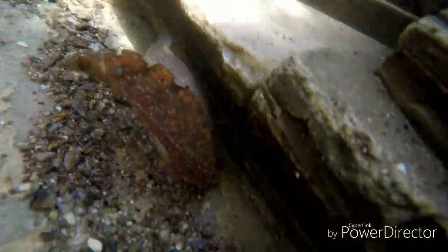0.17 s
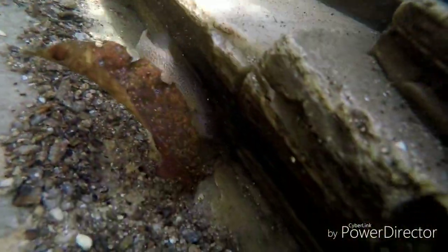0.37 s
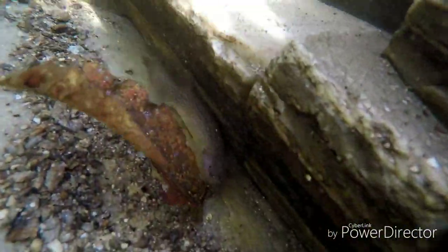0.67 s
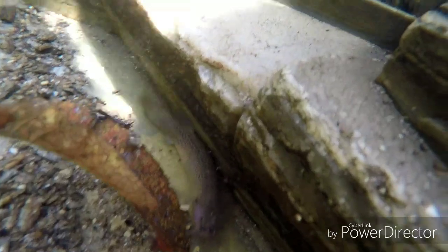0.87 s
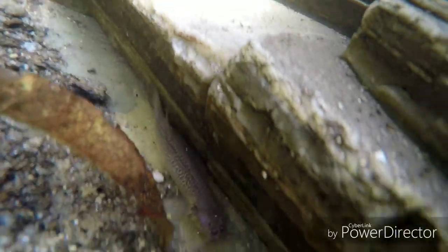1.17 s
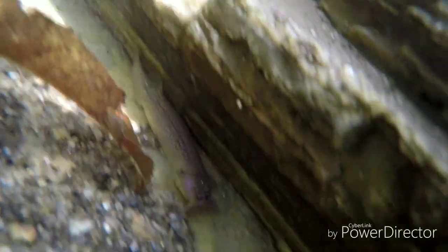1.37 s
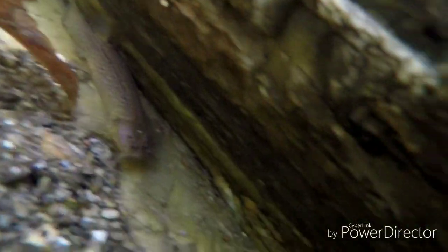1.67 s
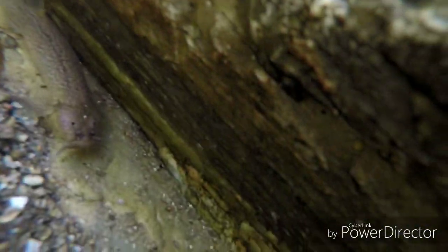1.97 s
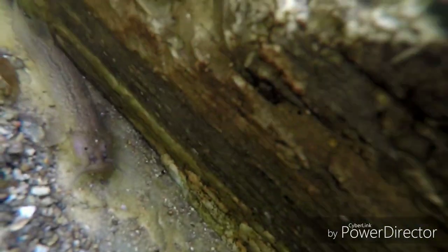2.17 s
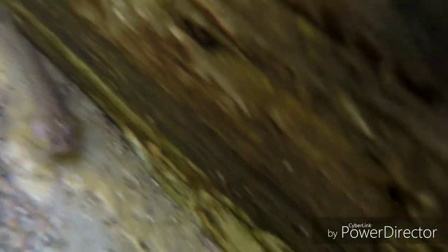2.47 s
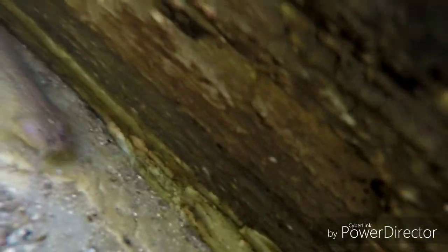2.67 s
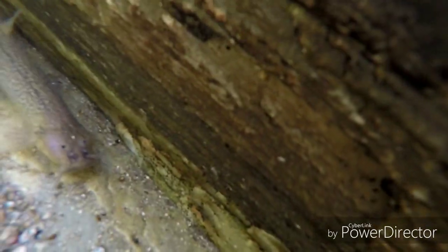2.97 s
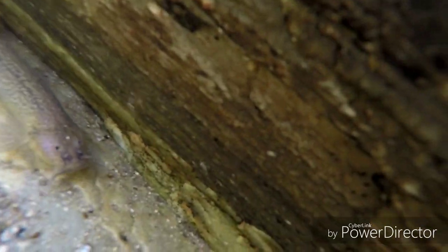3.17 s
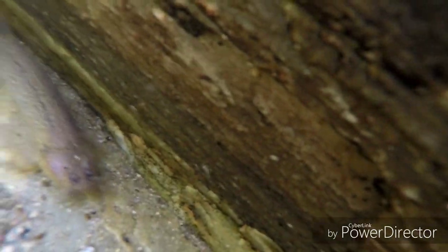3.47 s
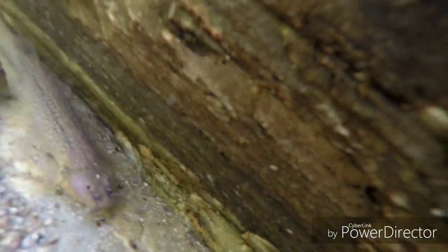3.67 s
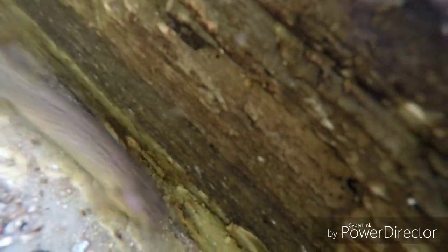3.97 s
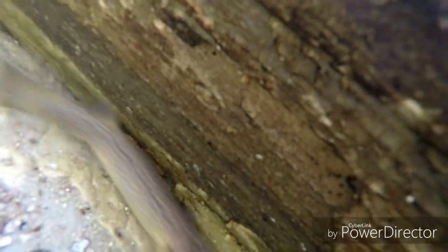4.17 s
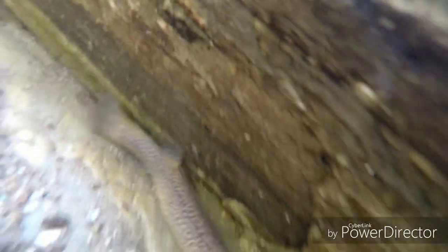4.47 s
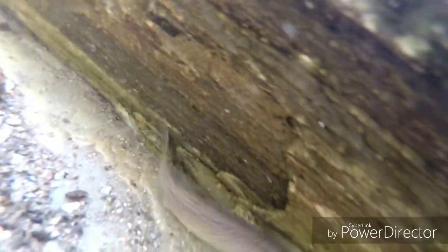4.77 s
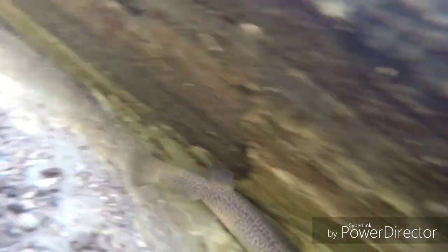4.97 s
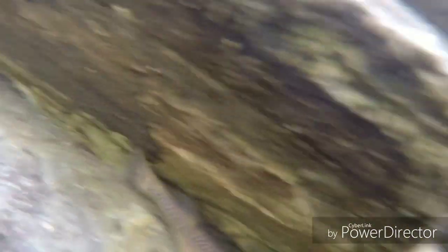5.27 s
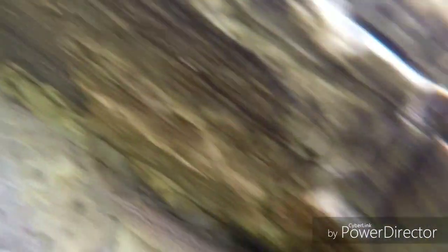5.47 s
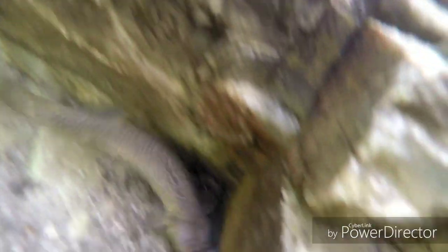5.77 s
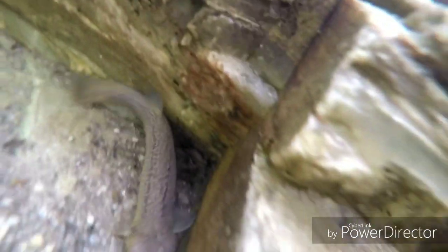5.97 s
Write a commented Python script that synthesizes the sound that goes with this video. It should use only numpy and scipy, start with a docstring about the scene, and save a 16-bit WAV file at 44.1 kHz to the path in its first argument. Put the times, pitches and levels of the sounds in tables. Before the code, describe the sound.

Submerged waterfall wash with ringing bubbles and faint sand ticks, broken by sharp knocks, boomy bumps and overloaded scraping around four seconds.

```python
"""Underwater in a pool below a waterfall, heard inside a waterproof camera housing. Throughout, shaped noise
and bubble tones form a muffled wash over a low noise rumble, and sand and pebbles click, strong hits with a
bright crackle. From 0.6 s near bubbles ring as damped sines, from 1.4 s bumps on rock give decaying low swings,
and from 1.7 s a gripping hand rustles. From 2.6 s, most densely from 3.7 to 4.2 s, noise jolts scrape the shell
over grit, the rumble swells near 4 s and the loudest bumps overload the input. Bubbles carry on to the end."""
import sys
import numpy as np
from scipy import signal
from scipy.fft import rfft, irfft, next_fast_len
from scipy.io import wavfile
from scipy.ndimage import uniform_filter1d, map_coordinates

SR = 44100
rng = np.random.default_rng(int(sys.argv[2]) if len(sys.argv) > 2 else 0)


def generate_wav(sig):
    """Save sig (samples, or channels by samples) to the path in sys.argv[1] as 16-bit PCM at SR."""
    pcm = np.round(np.clip(np.atleast_2d(sig).T, -1, 1) * 32767).astype(np.int16)
    wavfile.write(sys.argv[1], SR, pcm)


N = 269451


def amp(db):
    """Level definition: amplitude ratio of a level in dB."""
    return 10 ** (np.asarray(db) / 20)


def unit(x):
    """Energy normalisation: x at rms 1."""
    return x / np.sqrt(np.mean(x ** 2) + 1e-20)


def curves(rows):
    """Linear interpolation: one value per sample for each column after the time."""
    s, *columns = np.transpose(rows)
    return [np.interp(np.arange(N) / SR, s, column) for column in columns]


def wobble(rate):
    """Band-limited random modulation: a smooth curve through rate random knots a second."""
    knots = rng.standard_normal(int(N * rate / SR) + 4)
    return map_coordinates(knots, [np.arange(N) * rate / SR])


def filtered(x, response):
    """Linear filtering: the spectrum of x times a complex response of frequency."""
    m = next_fast_len(N + SR // 2)
    return irfft(rfft(x, m) * response(np.fft.rfftfreq(m, 1 / SR)), m)[:N]


def coloured(x, points):
    """Spectral shaping: x weighted by (f/Hz, level/dB) points on a log frequency axis, rms 1."""
    f, db = np.transpose(points)

    def response(hz):
        return amp(np.interp(np.log(hz + 1), np.log(f + 1), db, left=-120))
    return unit(filtered(x, response))


def resonate(x, modes):
    """Modal resonance: summed power peaks with steep skirts, made causal by minimum phase."""
    def response(f):
        power = 0
        for centre, width, db in modes:
            damping = (f * width) ** 2
            peak = damping / ((centre * centre - f * f) ** 2 + damping)
            power = power + amp(2 * db) * peak ** 1.665  # the exponent steepens the skirts
        # folding the cepstrum onto positive time gives minimum phase
        cepstrum = irfft(np.log(power + 1e-16) / 2)
        half = len(cepstrum) // 2
        cepstrum[1:half] *= 2
        cepstrum[half + 1:] = 0
        return np.exp(rfft(cepstrum))
    return filtered(x, response)


# resonances of the shell for sound in the water: f/Hz, width before steepening/Hz, level/dB
HOUSING_MODES = [(597, 352, 4), (863, 510, -34), (1386, 246, -5.5), (2146, 700, -7.5), (2514, 85, -7),
                 (2890, 1300, -19.5), (3840, 470, -13), (4450, 260, -17.5), (5820, 590, -22.5),
                 (7330, 1700, -28), (8540, 117, -18.5), (10600, 7100, -50)]


def housing(x):
    """Transmission through a resonant shell: sound in the water excites its modes."""
    return resonate(x, HOUSING_MODES)


# resonances of the shell when touched directly: f/Hz, width before steepening/Hz, level/dB
TOUCHED_MODES = [(509, 215, -7), (640, 210, -4), (704, 620, -9.5), (1079, 175, -6), (1570, 210, -8.5),
                 (2033, 230, -6), (2477, 340, -6), (2940, 600, -50), (3400, 570, -18.5), (4270, 510, -27.5),
                 (5150, 220, -31.5)]


def touch(blunt, sharp):
    """Contact excitation: blunt force rings the low modes, sharp force the high; wet grit lacks the very high."""
    low, high = np.split(TOUCHED_MODES, [4])

    def soft(x):
        return filtered(x, lambda hz: 1 / (1 + 1.1j * hz / 6000 - (hz / 6000) ** 2) ** 3)
    return np.array([resonate(soft(blunt), low), resonate(soft(sharp), high)])


EDGE_DB = 24  # a stroke swells from, and sinks to, this far under its full level


def strokes(rows, db, size):
    """Amplitude envelope: strokes swell, hold and sink, then three moving averages of size samples round them."""
    t, gain = np.arange(N) / SR, np.zeros(N)
    for (start, rise, hold, fall, *_), top_db in zip(rows, db):
        corners = start + np.cumsum([0, rise, hold, fall])
        shape_db = np.interp(t, corners, [-EDGE_DB, 0, 0, -EDGE_DB], left=-120, right=-120)
        gain = np.maximum(gain, amp(top_db + shape_db))  # overlapping strokes: the louder wins
    for _ in range(3):
        gain = uniform_filter1d(gain, size)
    return gain


def bubbles(s, db, hz, cycles, rise, count):
    """Bubble oscillation: damped sines with a soft start; pitch climbs as a bubble nears the surface."""
    t = np.arange(count) / SR
    age = t * (hz / cycles)[:, None]  # in lives of the given number of cycles
    envelope = amp(db)[:, None] * np.exp(-3 * age) * (1 - np.exp(-12 * age))
    turns = hz[:, None] * t * (1 + rise * np.minimum(age, 2))
    ring = envelope * np.sin(2 * np.pi * turns)
    at = np.round(s * SR).astype(int)[:, None] + np.arange(count)
    return np.bincount(at.ravel(), ring.ravel(), N + count)[:N]


def cloud(count, hz, octaves, cycles, size_db, length):
    """Random superposition: bubbles at random times, many faint and few strong, rms 1."""
    u, g = rng.random((count, 2)), rng.standard_normal(count)
    pitch_hz = np.clip(hz * 2 ** (octaves * g), 150, 12000)
    level_db = -size_db * np.log(u[:, 1])
    return unit(bubbles(u[:, 0] * N / SR, level_db, pitch_hz, np.full(count, cycles), .1, count=length))


# the waterfall's churning, before its fluctuations: t/s, wash level/dB, fizz level/dB
CHURN_LEVELS = [(0.0, -46, -50.5), (0.41, -47.5, -51), (0.63, -45.5, -50), (1.56, -46.5, -50.5),
                (1.94, -45.5, -50), (2.15, -44.5, -49), (2.75, -49, -52), (3.06, -47, -49.5),
                (3.45, -48.5, -52), (3.7, -46.5, -51), (4.34, -45.5, -49.5), (5.6, -46, -48.5),
                (6.11, -47, -51)]
# low rumble of water and of handling, swelling with the scrape near 4 s, before its fluctuations:
# t/s, slow rumble level/dB, quicker rumble level/dB
RUMBLE_LEVELS = [(0.0, -39.5, -55), (0.92, -44, -60), (1.53, -35.5, -55), (1.82, -41, -39.5),
                 (1.92, -43.5, -55), (2.45, -36, -57), (2.67, -47, -47), (2.91, -34.5, -68),
                 (3.03, -34, -54.5), (3.47, -42.5, -50), (3.78, -42, -57), (3.91, -31, -35),
                 (4.02, -20, -47), (4.2, -40, -48), (4.75, -39.5, -52), (5.31, -38, -51.5),
                 (5.51, -35, -46), (6.11, -34, -51)]
# relative spectra of wash, fizz, slow rumble and quicker rumble: f/Hz, level per Hz/dB
WASH_SPECTRUM = [(150, 27.5), (300, 2.5), (600, 1), (1200, -1.5), (1700, 0.5), (2200, -22)]
FIZZ_SPECTRUM = [(1300, -42), (1800, -4), (2200, 0.5), (5000, 0), (7000, -0.5), (10000, 6.5), (15000, 16.5)]
SLOW_SPECTRUM = [(12, 6), (25, 5.5), (45, -4.5), (70, -14.5), (110, -31), (200, -102)]
QUICK_SPECTRUM = [(50, 6), (90, 1.5), (170, -2), (240, -9.5), (400, -44), (700, -85)]
SLOW_WOBBLE_DB = 1.8  # unevenness of the slow rumble


def water():
    """Turbulence and bubble noise: far churning with nearer bubbles, over the low rumble of water and handling."""
    wash_db, fizz_db = curves(CHURN_LEVELS)
    slow_db, quick_db = curves(RUMBLE_LEVELS)
    big = cloud(count=2500, hz=585, octaves=0.625, cycles=6.3, size_db=1.0, length=1200)
    small = cloud(count=6000, hz=4675, octaves=0.672, cycles=12, size_db=2.1, length=400)
    clump_db = -9 + 2.5 * wobble(5)  # small bubbles arrive in clumps
    wash_source = rng.standard_normal(N) + amp(-17) * big
    fizz_source = rng.standard_normal(N) + amp(clump_db) * small
    wash = unit(housing(coloured(wash_source, WASH_SPECTRUM)))
    fizz = unit(housing(coloured(fizz_source, FIZZ_SPECTRUM)))
    surge = wobble(5.6)  # shared by wash and fizz
    wash_swell_db = .6 * surge + 1.2 * wobble(18)
    fizz_swell_db = 0.66 * surge + .7 * wobble(25)
    churn = amp(wash_db + wash_swell_db) * wash + amp(fizz_db + fizz_swell_db) * fizz
    slow = amp(slow_db + SLOW_WOBBLE_DB * wobble(9)) * coloured(rng.standard_normal(N), SLOW_SPECTRUM)
    quick = amp(quick_db + 1.26 * wobble(12)) * coloured(rng.standard_normal(N), QUICK_SPECTRUM)
    return churn + slow + quick


# a few sand grains at set times, one at 1.7 s much the loudest: t/s, nominal peak level/dB
SET_GRAINS = [(0.1476, -50), (1.6995, -21.5), (3.681, -46), (4.2916, -44)]


def sand():
    """Impact radiation: drifting grains tap the window as thin clicks, mostly faint."""
    u = rng.random((260, 3))
    random_db = -62 - 2.6 * np.log(u[:, 1])
    random_hz = 4000 * 4.3 ** u[:, 2]
    random_grains = bubbles(u[:, 0] * N / SR, random_db, random_hz, np.full(len(u), 2.5), 0, count=60)
    s, db = np.transpose(SET_GRAINS)
    return random_grains + bubbles(s, db, np.full(len(s), 5500), np.full(len(s), 1.1), 0, count=60)


# the clearest near bubbles: t/s, nominal peak level/dB, starting f/Hz
CLEAR_BUBBLES = [(.597, -34, 3170), (.628, -27.5, 608), (.99, -35, 573), (1.203, -33.5, 627),
                 (1.226, -36, 3200), (1.385, -33, 3250), (1.694, -35, 3780), (1.714, -31.5, 490),
                 (1.778, -32, 2910), (1.999, -33.5, 2830), (2.912, -34, 3770), (2.914, -33, 2410),
                 (2.963, -35, 2200), (3.197, -28, 610), (3.359, -35, 242), (3.362, -29, 652),
                 (3.494, -32, 480), (3.655, -31.5, 570), (4.897, -36, 5700), (5.209, -33, 2160),
                 (5.21, -26, 2960), (5.708, -32.5, 2270), (5.8, -26.5, 506), (6.012, -32, 615)]
# swarms of fainter bubbles drifting past: middle t/s, spread/s, mean nominal peak level of each bubble/dB
BUBBLE_SWARMS = [(0.549, 0.055, -42), (.98, 0.042, -47), (1.28, 0.064, -43), (1.74, 0.052, -42.5),
                 (2.021, 0.035, -42.5), (2.15, 0.032, -46.5), (4.85, .07, -47), (5.1, 0.049, -43.5),
                 (5.6, .08, -43)]
SWARM_HZ, SWARM_OCTAVES = 3540, 0.264  # central pitch, limit of the spread either way
LOW_CYCLES, HIGH_CYCLES = 12, 32  # life of a bubble under and over 1.5 kHz


def near_bubbles():
    """Free oscillation of single bubbles close to the housing: the clear ones and the swarms."""
    g = rng.standard_normal((len(BUBBLE_SWARMS), 3, 20))  # 20 bubbles a swarm
    middle, spread, swarm_db = np.transpose(BUBBLE_SWARMS)[:, :, None]
    swarm_hz = SWARM_HZ * 2 ** (SWARM_OCTAVES * np.tanh(g[:, 2]))
    swarm = [middle + spread * g[:, 0], swarm_db + 1.8 * g[:, 1], swarm_hz]
    s, db, hz = np.hstack([np.transpose(CLEAR_BUBBLES), np.reshape(swarm, (3, -1))])
    return bubbles(s, db, hz, np.where(hz < 1500, LOW_CYCLES, HIGH_CYCLES), 0.047, count=6000)


# the hand shifts its grip: start t/s, rise/s, hold/s, fall/s, level before rounding and unevenness/dB
GRIP_STROKES = [(1.666, 0.14, 0.14, 0.13, -40), (2.095, 0.043, 0.12, 0.041, -39),
                (4.806, 0.181, 0.011, .01, -41)]


def grip():
    """Friction noise: skin drags on the shell in small uneven tugs, a dull rustle."""
    tugs = rng.standard_normal(N) * amp(1.8 * wobble(48))
    gain = strokes(GRIP_STROKES, np.transpose(GRIP_STROKES)[4], size=300)
    return gain * coloured(tugs, QUICK_SPECTRUM)


# strokes over grit, levels before rounding: start t/s, rise/s, hold/s, fall/s,
# blunt contact level/dB, sharp over blunt level/dB, shove over blunt level/dB
SCRAPE_STROKES = [(2.576, 0.0072, .016, .024, -15, 3, 2.5), (2.648, 0.0019, .004, .012, -38, 4, 5),
                  (2.665, 0.0079, .004, .008, -32.5, 0.5, -1.5), (2.737, 0.0054, .014, .008, -51, 1, -15),
                  (2.82, 0.016, .003, 0.015, -23, -8, -6), (3.713, 0.017, .006, 0.022, -32.5, -3.5, -10),
                  (3.742, 0.0094, .068, .014, -15, 0.5, 2), (3.883, 0.033, .02, .01, -36.5, -12, -9),
                  (3.921, 0.021, .006, .025, -27, -3, 5.5), (3.957, 0.018, .025, .01, -23, -3, -2.5),
                  (3.981, 0.015, .025, 0.038, -16.5, -1, -9), (4.013, 0.03, .04, .026, -21.5, 1, -1),
                  (4.075, 0.0074, .03, .015, -38, -2, -3), (4.185, 0.021, .032, .012, -27.5, -1.5, 1)]
# relative spectrum of the shove on the whole housing: f/Hz, level per Hz/dB
SHOVE_SPECTRUM = [(30, -14), (70, 7.5), (140, 3.5), (200, 0), (280, -9.5), (500, -49.5)]
JOLT_DB = 3.2  # fast unevenness of the grit


def scrapes():
    """Stick-slip friction: dense uneven jolts of grit ring the shell and shove the whole housing."""
    blunt_db, sharp_db, shove_db = np.transpose(SCRAPE_STROKES)[4:]
    unevenness = amp(JOLT_DB * wobble(500) + 1.1 * wobble(140))
    jolts = unevenness * rng.standard_normal((2, N))
    strength = np.std(touch(*jolts), axis=1, keepdims=True)  # of the steady ringing, to normalise it
    blunt_gain = strokes(SCRAPE_STROKES, blunt_db, size=16)
    sharp_gain = strokes(SCRAPE_STROKES, blunt_db + sharp_db, size=16)
    shove_gain = strokes(SCRAPE_STROKES, blunt_db + shove_db, size=110)
    shove = shove_gain * coloured(rng.standard_normal(N), SHOVE_SPECTRUM)
    ringing = touch(*(jolts * [blunt_gain, sharp_gain])) / strength
    return ringing.sum(axis=0) + shove


# pebbles ticking on the housing: t/s (1 ms before the contact), nominal blunt peak level/dB,
# sharp over blunt level/dB
PEBBLE_TICKS = [(0.17, -40.5, -15), (1.442, -29.5, 2), (1.882, -48, 2), (2.143, -40, 7), (2.584, -23, -4),
                (2.601, -16, 8), (2.648, -30.5, 7), (2.677, -35, -4), (2.704, -40, -13), (2.737, -42, -10),
                (2.825, -34, -2), (2.838, -25.5, 3.5), (3.144, -42.5, 7), (3.16, -35.5, 11),
                (3.264, -44.5, 8.5), (3.355, -46, 7), (3.725, -37, 5), (3.753, -21.5, -14), (3.776, -9, -4),
                (3.796, -13, 3.5), (3.808, -15, -1), (3.812, -17.5, -8), (3.938, -28, 0), (3.967, -24, 3),
                (3.998, -16, 4), (4.197, -30, -7), (4.376, -53, -22)]
CRACKLE_DB = -19  # thin bright crackle of input overload on strong hits: its level at a full-scale tick
CRACKLE_GROWS = 1.6  # dB of crackle per dB of sharp level: it fades faster than the ring as ticks weaken


def ticks():
    """Impulse response: a short contact rings the shell; strong hits add a thin bright crackle of overload."""
    blows, t = np.zeros((3, N + SR)), np.arange(200) / SR
    envelope = amp(-60 * t / 0.0012) * (1 - np.exp(-t / 0.00055))
    for s, blunt_db, sharp_over_db in PEBBLE_TICKS:
        sharp_db = blunt_db + sharp_over_db
        burst = rng.standard_normal((3, len(t))) * envelope
        burst[0] = np.abs(burst[0])  # the blunt part pushes one way
        burst = burst / np.linalg.norm(burst, axis=1, keepdims=True)
        levels = amp([[blunt_db], [sharp_db], [CRACKLE_GROWS * sharp_db + CRACKLE_DB]])
        blows[:, round((s + .001) * SR):][:, :len(t)] += levels * burst
    one_blow = signal.unit_impulse(N)
    peak = np.abs(touch(one_blow, one_blow)).max(axis=1, keepdims=True)

    def crackle_band(hz):
        return (1j * hz / 5000 / (1 + 1j * hz / 5000)) ** 3 / (1 + 1j * hz / 9500) ** 2
    crackle = filtered(blows[2, :N], crackle_band)
    return (touch(*blows[:2, :N]) / peak).sum(axis=0) + crackle / peak[1]


# low swings from bumps against rock; the 1.448 row is a second, higher wobble of the bump at 1.446:
# t/s, level before onset and decay/dB, first f/Hz, last f/Hz, 60 dB decay time/s, direction (sign)
BUMP_SWINGS = [(1.446, -6.5, 120, 30.4, 0.05, -1), (1.448, -15, 195, 182, 0.046, -1),
               (1.535, -24, 45, 32.2, 0.25, 1), (1.838, -26, 50, 34.2, 0.31, -1),
               (2.582, 7.5, 115, 35.5, .11, -1), (2.851, -19, 89, 49.7, 0.077, 1),
               (3.166, -17, 110, 50.5, 0.036, -1), (3.243, -24, 110, 50, 0.047, -1),
               (3.753, -3, 68, 30.3, 0.28, -1), (3.816, 1.5, 50, 28, 0.11, 1),
               (3.994, 3.5, 129, 41.3, 0.17, 1), (4.242, -18.5, 50, 30, 0.15, 1),
               (4.444, -15.5, 59, 43.5, 0.15, 1), (5.006, -12, 43, 28.4, 0.14, 1)]
SETTLE_S = 0.0089  # how fast the swing slows


def bumps():
    """Damped oscillation: bumps on rock swing the housing, and each swing slows as the contact lets go."""
    out, t = np.zeros(N + SR), np.arange(SR // 2) / SR
    for s, db, first_hz, last_hz, t60, direction in BUMP_SWINGS:
        turns = last_hz * t + (first_hz - last_hz) * SETTLE_S * (1 - np.exp(-t / SETTLE_S))
        onset = (1 - np.exp(-t * first_hz / 0.13)) ** 2
        swing = np.sin(2 * np.pi * turns) * amp(db - 60 * t / t60) * onset
        out[round(s * SR):][:len(t)] += direction * swing
    return out[:N]


def scene():
    """Superposition: everything reaches one microphone inside the housing."""
    return (water() + sand() + near_bubbles() + grip() + scrapes() + ticks() + bumps())[None]


# relative spectrum of the microphone's own hiss: f/Hz, level per Hz/dB
HISS_SPECTRUM = [(2940, -41), (5000, -13), (5860, 2), (6580, -23), (8550, 7.5), (15200, -13.5)]
DUCK_KNEE_DB, DUCK_SLOPE, DUCK_RELEASE_S = -24.5, 0.16, 0.04  # gain control
TOP_HZ = 15350  # band limit


def record(dry):
    """Compression and saturation: gain ducks after loud moments, then overload, roll-off, hiss and band limit."""
    power = np.abs(filtered(dry[0] ** 2, lambda hz: 1 / (1 + 2j * np.pi * hz * DUCK_RELEASE_S)))
    x = dry[0] * (1 + power / amp(2 * DUCK_KNEE_DB)) ** (-DUCK_SLOPE / 2)
    x = x / (1 + np.abs(x / 0.9) ** 6) ** (1 / 6)  # soft overload towards 0.9
    x = filtered(x, lambda hz: 1 / (1 + 1j * hz / 9000) ** 2)
    x = x + amp(-77.5) * coloured(rng.standard_normal(N), HISS_SPECTRUM)
    return filtered(x, lambda hz: hz < TOP_HZ)[None]


dry = scene()
out = record(dry)
generate_wav(out)
```